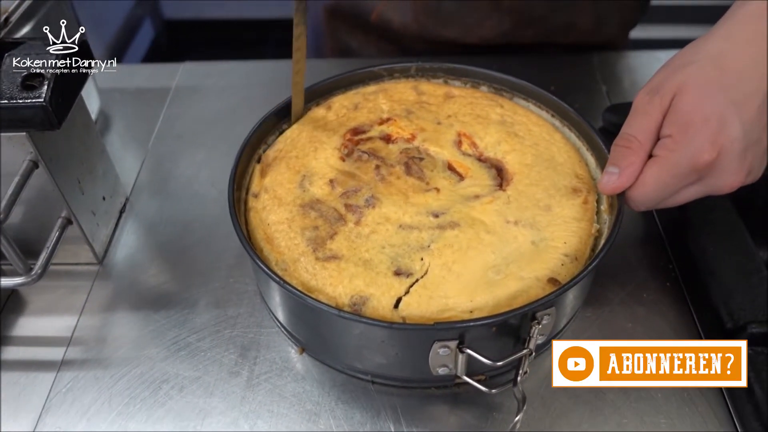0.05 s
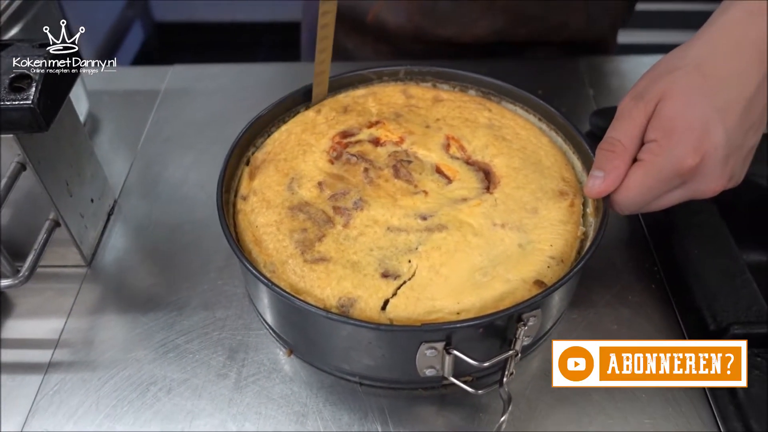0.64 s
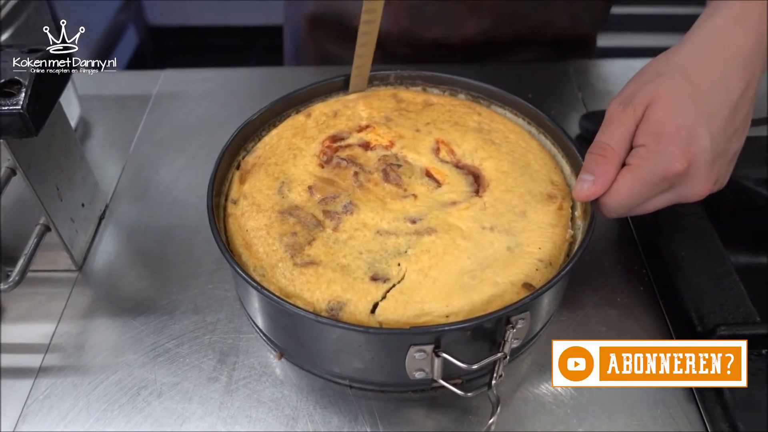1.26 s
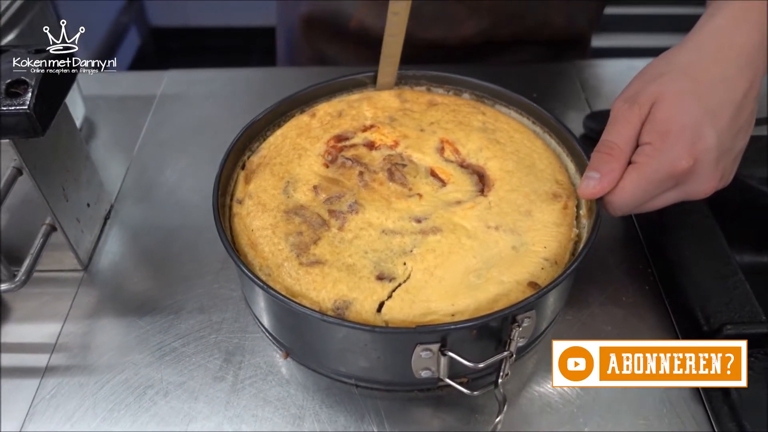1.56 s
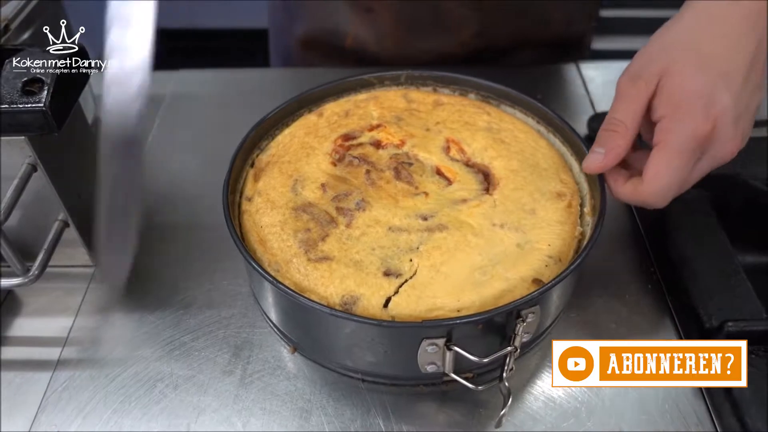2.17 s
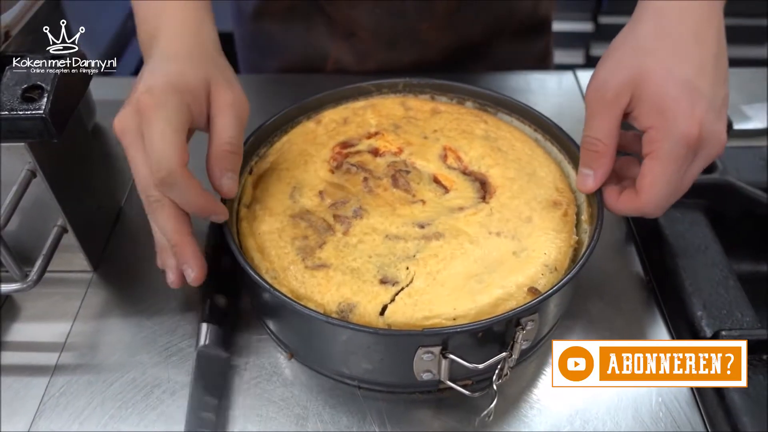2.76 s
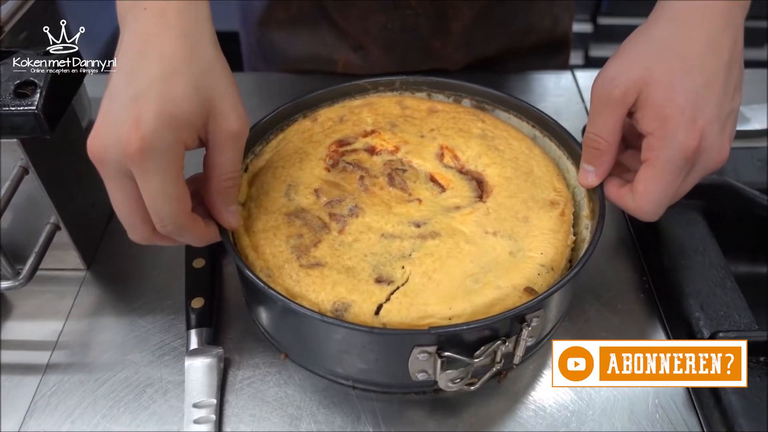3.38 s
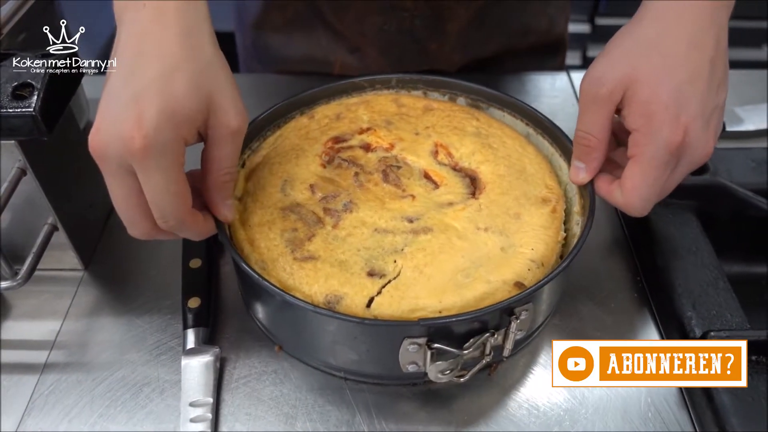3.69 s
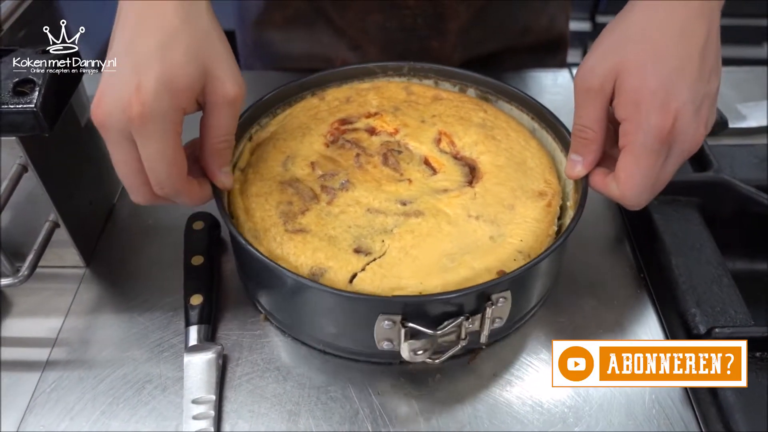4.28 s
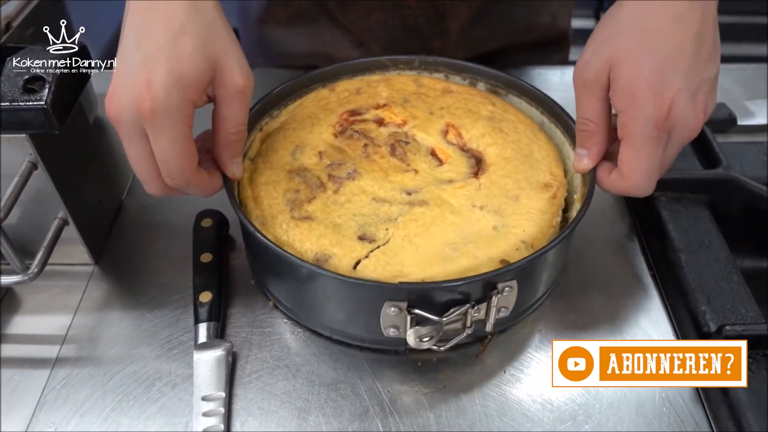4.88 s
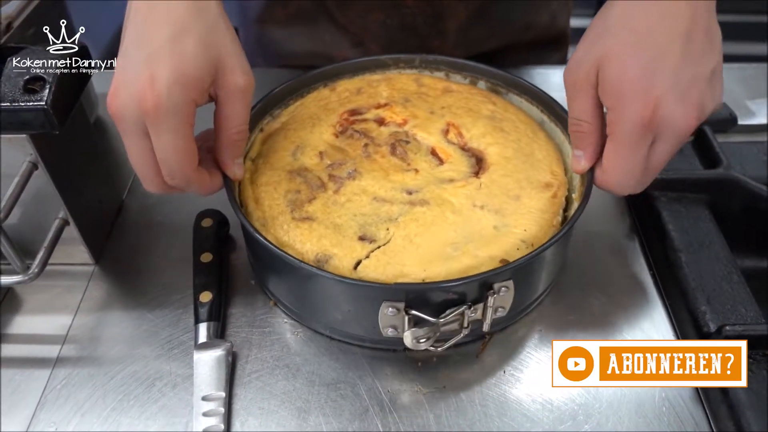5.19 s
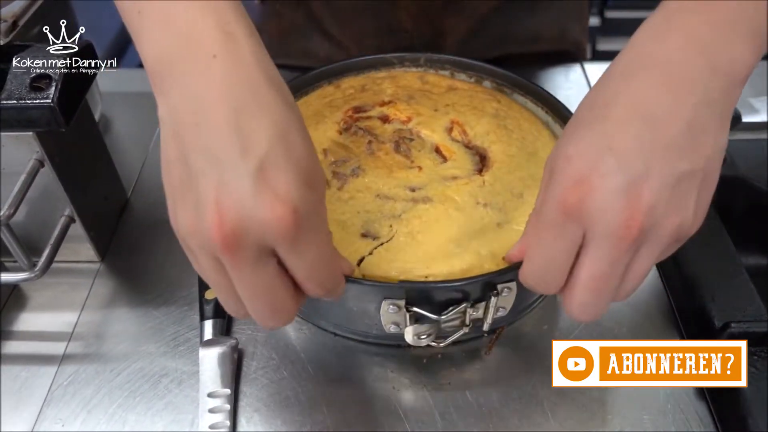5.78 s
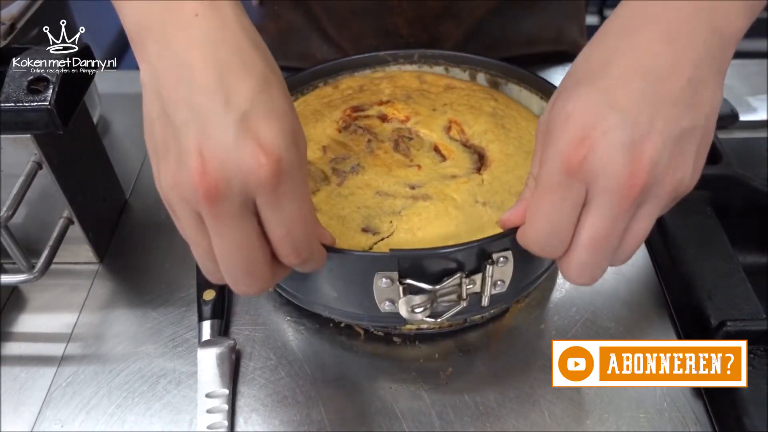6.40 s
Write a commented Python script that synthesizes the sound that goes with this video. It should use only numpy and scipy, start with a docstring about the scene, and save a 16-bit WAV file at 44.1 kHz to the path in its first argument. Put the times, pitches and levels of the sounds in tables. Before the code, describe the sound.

Soft kitchen ventilation rushes throughout with a faint motor hum. For the first two seconds a knife makes short, quiet scrapes around a metal springform pan, the earliest with a thin squeak. The blade pings on the rim at about 1.9 seconds. From 2.4 to 3.2 seconds the knife clatters onto a steel counter, blade and handle bouncing and ringing, loudest around 2.8. The background swells with the clatter, dips near 3.5 seconds and recovers. After one click at 3.3, the clasp is worked open from 3.7 to 4.5 seconds in a dense run of sharp clicks, knocks and scrapes that make the pan's wall chime. Lighter ticks follow. Between 5.3 and 6.6 seconds the loosened ring is lifted with brief rasps, ticks and snaps, the strongest near 5.8. Everything sounds close, with a short echo from hard walls.

```python
"""Kitchen ventilation hums while a knife scrapes and squeaks round a cheesecake in a springform pan. The blade
pings on the rim, then the knife clatters onto a steel counter, and both ring. The background level rises during
the clatter, then dips briefly and recovers. Then the clasp is worked open in a string of clicks that make the
pan's wall chime, and the loosened ring scrapes as it is lifted while the pan knocks on the counter."""
import sys
import numpy as np
from scipy import signal
from scipy.fft import rfft, irfft
from scipy.io import wavfile
from scipy.ndimage import uniform_filter1d

SR = 44100
rng = np.random.default_rng(int(sys.argv[2]) if len(sys.argv) > 2 else 0)


def digitize_waveform(pressure):
    """Quantize a signal to 16-bit integers and store it at the path in sys.argv[1].

    Rows of a 2-D input are taken as channels; values are limited to [-1, 1].
    """
    field = np.atleast_2d(pressure).T
    bounded = np.clip(field, -1, 1)
    quanta = np.round(bounded * 32767).astype(np.int16)
    wavfile.write(sys.argv[1], SR, quanta)


N = 293265


def amp(db):
    return 10 ** (np.asarray(db) / 20)


def unit(x):
    return x / np.sqrt(np.mean(x ** 2) + 1e-20)


def fade(t, t60):
    """Dies away by 60 dB in t60 seconds, the "ring time"."""
    return 1e-3 ** (t / t60)


def read(points, hz):
    """Looks up a curve at the given frequencies."""
    f, value = np.transpose(points)
    return np.interp(np.log(hz + 1), np.log(f + 1), value)


def add(mix, start, sound):
    part = mix[:, round(start * SR):][:, :sound.shape[1]]
    part += sound[:, :part.shape[1]]


def colour(x, points):
    """Shapes the lows and highs of x by (Hz, dB) points, then sets its strength to 1."""
    return unit(irfft(rfft(x) * amp(read(points, np.fft.rfftfreq(N, 1 / SR))), N))


def resonate(x, hz, width_hz):
    """Keeps one pitch of x; a narrower peak rings longer."""
    return signal.lfilter(*signal.iirpeak(hz, hz / width_hz, SR), x)


def spread(pair, width, balance_db):
    """Turns a middle and a side signal into left and right."""
    middle, side = pair[0], width * pair[1]
    return np.array([(middle + side) * amp(balance_db / 2), (middle - side) * amp(-balance_db / 2)])


# The tone of the air. Each row: frequency in Hz, relative level in dB.
AIR_TONE = [(18, -78.5), (30, -36.5), (98, -25.5), (146, -14), (182, -13), (422, -5.5), (540, 0.5),
            (907, -5), (1000, -5.5), (1250, -6.5), (1420, -4), (2620, -7.5), (3900, -15), (4630, -14.5),
            (11000, -20), (14300, -61), (22000, -120)]
# Each row: frequency in Hz, how alike the air is left and right (1 is the same).
AIR_LIKENESS = [(60, 0.78), (140, 0.96), (350, 0.96), (840, 0.86), (2030, 0.45), (4890, 0.063),
                (11800, 0.13)]
# The motor's hum. Each row: pitch in Hz, level at the start in dB.
MOTOR_HUM = [(100, -85), (147, -94.5), (197, -73)]
# The background level as it is heard. Each row: time in seconds, level in dB.
BACKGROUND_LEVEL = [(0, -50), (.9, -49), (1.6, -51.5), (2.35, -50.5), (2.8, -43), (3.45, -61.5), (3.8, -59),
                    (4.6, -51), (5, -50.5), (5.6, -49.5), (6.3, -51), (6.65, -52.5)]

def ventilation(patchy_db=2.0):
    """Rushing air whose tone wavers in patches, and a faint motor hum."""
    frames, hz, t = N // 256 + 5, np.fft.rfftfreq(1024, 1 / SR), np.arange(N) / SR
    noise = rng.standard_normal((5, frames, len(hz))).transpose(0, 2, 1)
    left, separate = noise[0] + 1j * noise[1], noise[2] + 1j * noise[3]
    patches = unit(uniform_filter1d(uniform_filter1d(noise[4], size=8, axis=0), size=12, axis=1))
    alike = read(AIR_LIKENESS, hz)[:, None]
    right = alike * left + np.sqrt(1 - alike ** 2) * separate
    spectrum = np.array([left, right]) * amp(read(AIR_TONE, hz)[:, None] + patchy_db * patches)
    air = unit(signal.istft(spectrum, nperseg=1024, noverlap=768)[1][:, :N])
    hum = sum(amp(db) * np.sqrt(2) * np.sin(2 * np.pi * f * t) for f, db in MOTOR_HUM)
    level = amp(np.interp(t, *np.transpose(BACKGROUND_LEVEL)))
    return level * (air + hum / level[0])


def pressure(strokes):
    """The push swells and fades with each stroke."""
    push = np.zeros((1, N))
    for start, length, db in strokes:
        add(push, start, amp(db) * np.hanning(int(length * SR))[None])
    return push


# Blade or ring scrapes the pan. Each row: start in seconds, length in seconds, level in dB.
SCRAPE_STROKES = [(0.027, 0.089, -51.5), (.18, 0.058, -52.5), (0.367, 0.062, -52.5), (0.531, .06, -45.5),
                  (1.015, 0.072, -52), (1.647, 0.053, -50.5), (1.797, 0.066, -47.5), (3.935, 0.16, -45),
                  (4.03, 0.26, -39.5), (4.17, 0.14, -41), (4.35, 0.043, -42.5), (5.315, 0.076, -33.5),
                  (5.723, 0.055, -33.5), (6.052, 0.098, -39), (6.37, 0.11, -44.5)]
# The tone of a scrape. Each row: frequency in Hz, relative level in dB.
SCRAPE_TONE = [(800, -11), (2500, 3), (4200, 2), (5200, 2.5), (5750, 1.5), (6500, -7.5), (11000, -3.5)]
# The blade squeaks on the wall. Each row: start in seconds, length in seconds, level in dB.
SQUEAK_STROKES = [(.03, 0.063, -61), (.19, 0.046, -65), (.38, 0.055, -66), (.54, 0.062, -52.5)]

def scrapes(slips_per_s=5000, uneven_db=2.5):
    """Steel slides along the pan in tiny uneven slips; under the blade they stir up a squeak."""
    sizes = amp(uneven_db * np.minimum(rng.exponential(1, N), 4))
    slips = rng.standard_normal((2, N)) * sizes * (rng.random(N) < slips_per_s / SR)
    rasp = pressure(SCRAPE_STROKES) * colour(slips, SCRAPE_TONE)
    squeak = pressure(SQUEAK_STROKES) * unit(resonate(slips, hz=5770, width_hz=70))
    return spread(rasp + squeak, width=0.46, balance_db=-1.5)


# The five bands of a hit, bass to treble. Each row: low edge in Hz, high edge in Hz,
# ring time multiplier, stereo width, left over right in dB.
HIT_BANDS = [(358, 722, 2.95, 0.092, 0.2), (610, 1185, 2.37, 0.18, 1.2), (1417, 2980, 1.46, 0.39, 1),
             (2790, 6080, 1.15, 0.52, 0.3), (6040, 12900, 1.36, 0.78, -5)]

def steel_hit(levels, chatter_s, t60, tail_db, tail_t60, rattle_db=3.0):
    """Steel on steel: a burst of tiny impacts, then a crowd of tones dies away over a softer tail."""
    t = np.arange(SR // 2) / SR
    out = np.zeros((2, len(t)))
    bounces = unit(uniform_filter1d(rng.standard_normal(len(t)), size=60))
    rattle = amp(rattle_db * bounces * fade(t, 0.57))  # impacts bunch up while the parts still touch
    for db, (low, high, stretch, width, balance_db) in zip(levels, HIT_BANDS):
        ring = fade(np.maximum(t - chatter_s, 0), min(t60 * stretch, max(t60, .4)))
        shape = np.hypot(ring, amp(tail_db) * fade(t, tail_t60)) * (1 - fade(t, 0.003))
        band = signal.butter(3, [low, high], "band", fs=SR, output="sos")
        burst = signal.sosfilt(band, shape * rattle * rng.standard_normal((2, len(t))))
        burst *= np.linalg.norm(shape) / np.linalg.norm(burst, axis=1, keepdims=True)
        out += amp(db) * spread(burst, width, balance_db)
    return out


def chime(tones, phase_gap, balance_db):
    """Fading pure tones (Hz, ring time, dB); the higher they are, the more left and right differ."""
    t, sides = np.arange(SR * 2 // 5) / SR, np.array([[.5], [-.5]])
    hz, t60, db = np.transpose(tones)
    height = hz / 8000
    phase = 2 * np.pi * rng.random(len(hz)) + sides * phase_gap * height
    gains = amp(db + sides * balance_db * height ** 3) * np.exp(1j * phase)
    waves = np.exp(2j * np.pi * hz[:, None] * t) * fade(t, t60[:, None])
    return np.sqrt(2) * (gains @ waves).imag * (1 - fade(t, 0.003)) ** 2


def sheet(hits, tones, flex_db, thump_db):
    """A struck steel sheet rings on; it also bends slowly and thumps the counter frame."""
    rings = sum(amp(db) * resonate(hits, hz, width) for hz, width, db in tones)
    force = np.sqrt(abs(signal.lfilter(*signal.butter(1, 12, fs=SR), hits.mean(0) ** 2)))
    flex_tone = [(60, -36), (130, -16), (200, 1), (280, -3), (400, -25.5), (1500, -85.5)]
    flex = colour(rng.standard_normal(N), flex_tone)
    thump = colour(rng.standard_normal(N), [(8, -21), (25, 0), (100, 1.5), (200, -17.5), (800, -83)])
    return hits + rings + force * (amp(flex_db) * flex + amp(thump_db) * thump)


def struck_at(place, values):
    """Blends the values for places on the blade: 0 (or less) edge, 1 tip, 2 flat, 3 heel."""
    return np.interp(place, np.arange(len(values)), values)


def tilted(bands_db, bright_db, pivot_band):
    """Tilts a hit's tone: positive brightness lifts the bands above the pivot and thins those below."""
    return np.array(bands_db) + bright_db * (np.arange(len(bands_db)) - pivot_band)


# Hits on edge, tip, flat and heel. Each row: base ring time in seconds, five band levels in dB.
BLADE_PLACES = [(0.047, -16, -16, -5, 0, -2.5), (0.45, -13.5, -1, 1.5, 0.0056, 2),
                (0.344, -17, -11, -4, -1, 5), (0.098, -10.5, -12.5, -7, -1, 9.5)]
# The blade lands. Each row: start in seconds, chatter in seconds, relative level in dB,
# blade ring in dB, place on the blade.
BLADE_HITS = [(1.853, .010, -38, -48, 0), (1.861, .008, -35, -33, 0), (2.351, .0025, -30, -30, 1),
              (2.499, .011, -27.5, -25, 1.7), (2.543, .016, -31, -28.5, 2.2),
              (2.560, .036, -29.5, -22.5, 2), (2.610, .003, -33, -36, 1.3), (2.864, .010, -30, -36, 3),
              (2.958, .009, -33.5, -26.5, 3), (3.000, .004, -39, -26.5, 0), (3.041, .0036, -31.5, -34, 3),
              (3.121, .003, -32, -43, 3), (3.173, .003, -35, -50, 3)]

def blade_hits():
    """The blade meets rim or counter; the place that lands sets the tone."""
    hits = np.zeros((2, N))
    for start, chatter_s, db, _, place in BLADE_HITS:
        t60, *bands = [struck_at(place, column) for column in zip(*BLADE_PLACES)]
        add(hits, start, steel_hit(db + np.array(bands), chatter_s, t60, tail_db=-23, tail_t60=.45))
    return hits


# The blade's own tones. Each row: pitch in Hz, ring time in seconds,
# then relative level in dB when struck on the edge, the tip, the flat and the heel.
BLADE_TONES = [(4016, .12, -6, -22, -16, -25), (4075, .24, -22, -6, 3, -13), (4495, .18, -3, -16, -22, -3),
               (5308, .12, 2, -20, -24, 4), (5792, .22, -24, -18, -2, -20), (6000, .15, -12, -15, -25, -11),
               (7770, .13, -3, 0, 4, -13), (8262, .2, -26, -20, -19, 5.5), (2487, .2, -20, -2, -8, -8),
               (4635, .2, -9, -5, -19, -18), (5658, .2, -22, 0, -9, -16), (6372, .16, -11, -16, -14, -20),
               (1700, .45, -20, -2, -14, -22), (2089, .33, -13, -4, -19, -24),
               (2600, .15, -5, -20, -24, -22), (5030, .15, -22, -9, -20, -22),
               (5475, .2, -18, -24, -22, -9), (6620, .27, -24, -7, -16, -22),
               (7055, .3, -19, -13, -21, -17), (8834, .24, -24, -8, -20, -22),
               (9150, .16, -22, -14, -22, -10), (9750, .15, -16, -20, -22, -22),
               (10136, .25, -21, -12, -14, -20), (10470, .2, -15, -22, -22, -11),
               (10850, .25, -22, -10, -18, -19)]

def blade_ring(hits):
    """Each new touch stops the blade's ringing and starts it afresh."""
    rings = np.zeros((2, N))
    damping = fade(np.arange(SR // 2) / SR, 0.017)
    for start, *_, ring_db, place in sorted(hits):
        rings[:, round(start * SR):][:, :len(damping)] *= damping
        tones = [(hz, t60, struck_at(place, levels)) for hz, t60, *levels in BLADE_TONES]
        add(rings, start, amp(ring_db) * chime(tones, phase_gap=1.64, balance_db=-3))
    return rings


# The handle's tone: a relative level in dB for each of the five bands.
HANDLE_TONE = [-5, -3, .5, -4, -4]
# The handle lands. Each row: start, chatter and base ring time in seconds, relative level in dB,
# brightness in dB per band, blade ring in dB, place on the blade.
HANDLE_HITS = [(2.751, .004, .03, -39, 4.5, -40, 0.5), (2.759, 0.0081, .05, -30, 2, -34, -3),
               (2.7765, .006, .02, -18.5, -.5, -34, 1), (2.786, .032, .03, -25, 0, -25, 2),
               (2.824, 0.031, .008, -20.5, 0, -21, 2.5), (2.88, 0.026, .04, -28.5, 4.5, -31.5, 3),
               (2.906, 0.035, .03, -25, 1, -27, 3), (2.934, .017, .01, -22.5, -0.5, -28.5, 3),
               (2.980, 0.026, .34, -29.5, 0, -28.5, 3)]

def handle_hits():
    """The handle drops and rocks on the counter."""
    hits = np.zeros((2, N))
    for start, chatter_s, t60, db, bright, _, _ in HANDLE_HITS:
        levels = db + tilted(HANDLE_TONE, bright, 2.3)
        add(hits, start, steel_hit(levels, chatter_s, t60, tail_db=-33, tail_t60=0.48, rattle_db=2.5))
    return hits


# The counter top's tones. Each row: pitch in Hz, width in Hz, relative level in dB.
COUNTER_TONES = [(470.7, 5.4, 5), (698, 9.3, -3.5), (860, 83, -0.5), (1056, 12, 5.5), (1583, 39, 2.5),
                 (1760, 23, -2.5)]

def knife_clatter():
    """Blade and handle bounce to rest, shaking both the counter and the blade."""
    counter = sheet(blade_hits() + handle_hits(), COUNTER_TONES, flex_db=-35.5, thump_db=-47.5)
    return amp(-3) * counter + blade_ring(BLADE_HITS + HANDLE_HITS)


# Each row: start in seconds, relative level in dB, brightness in dB per band, tail in dB, chime in dB.
CLASP_SNAPS = [(3.318, -38.5, -3.5, -23, -11), (3.924, -28.5, 0.5, -13.5, -12.5),
               (4.054, -27.5, 0.5, -4, -22), (4.189, -28, 2, -7.5, -11), (4.252, -37.5, -0.5, -14, -5),
               (4.315, -27, -3.5, -26, -24), (4.449, -22.5, -0.5, -14.5, -12), (5.341, -31, -3, -21, -30),
               (5.756, -25.5, 1, -26, -32), (5.764, -22.5, -2.5, -11, -8), (6.023, -26, 0, -12.5, -11)]

def snaps(bands_db=(-17, -12, 0.5, -0.5, -0.5), hz=4100, t60=0.04):
    """Lists the clicks of the clasp or ring springing free."""
    return [(start, db + tilted(bands_db, bright, 2.05), hz, t60, tail_db, chime_db)
            for start, db, bright, tail_db, chime_db in CLASP_SNAPS]


# Each row: start in seconds, relative level in dB, brightness in dB per band, pitch in Hz.
LEVER_TICKS = [(3.731, -52, -4.5, 3730), (3.799, -34.5, -0.5, 2970), (3.829, -45.5, -1, 4140),
               (3.859, -39, -1, 4480), (3.888, -34, -2.5, 5140), (3.96, -27.5, 2, 5500),
               (3.992, -31, 2, 2900), (4.013, -34, .5, 5290), (4.04, -26.5, -4, 3900),
               (4.103, -39, -4.5, 4450), (4.125, -31, 7.5, 4180), (4.149, -30.5, -1, 4500),
               (4.375, -22.5, -0.5, 6100), (4.41, -31, 7, 6040), (4.512, -32.5, 1.5, 2900),
               (4.561, -44.5, 0, 3190), (4.673, -41.5, -2, 3010), (4.919, -40, 3.5, 4270),
               (4.976, -45, -5, 4730), (5.036, -36.5, 3.5, 4700), (5.188, -41.5, -3, 4250),
               (5.259, -37.5, -2.5, 3930), (5.316, -32.5, -3.5, 3800), (5.343, -23.5, -1.5, 3950),
               (5.908, -38, 3, 4870), (5.937, -32.5, 1.5, 4900), (6.082, -33, -1, 4170),
               (6.094, -28.5, 0, 4490), (6.134, -42, 11.5, 3660), (6.195, -39, 3, 4110),
               (6.574, -31.5, 0.5, 4340), (6.623, -41.5, -3, 4700)]

def ticks(bands_db=(-23, -17.5, -9.5, 0.5, -6), t60=0.028, tail_db=-18.5, chime_db=-20):
    """Lists the clicks of the lever slipping and catching, plus a faint one from handling the pan."""
    faint = (rng.uniform(3.8, 4.3), -46, 0, 4200 * 2 ** rng.uniform(-.5, .5))
    return [(start, db + tilted(bands_db, bright, 3), hz, t60, tail_db, chime_db)
            for start, db, bright, hz in LEVER_TICKS + [faint]]


# Each row: start in seconds, relative level in dB, brightness in dB per band.
PAN_KNOCKS = [(4.02, -38, 2.5), (4.039, -26.5, 3), (4.178, -31, 1.5), (4.32, -26.5, .5), (4.722, -39, -1),
              (4.87, -35.5, -1), (5.036, -41.5, -4.5), (5.814, -35.5, -2.5)]

def knocks(bands_db=(-0.5, -0.5, -5, -5, -10.5), hz=3700, t60=0.027, tail_db=-13, chime_db=-30):
    """Lists the duller knocks of the pan's bottom on the counter."""
    return [(start, db + tilted(bands_db, bright, 2.1), hz, t60, tail_db, chime_db)
            for start, db, bright in PAN_KNOCKS]


# The wall's bell-like tones. Each row: pitch in Hz, ring time in seconds when not held, relative dB.
WALL_TONES = [(1835, 0.3, -6), (2065, 0.26, -5.5), (2147, 0.21, -6), (2240, 0.24, -6.5), (2244, 0.26, 1.5),
              (2330, 0.2, -2.5), (2350, 0.19, -2.5), (2440, .28, -1), (2500, 0.17, -5.5), (2540, 0.28, -3),
              (2710, 0.23, -9.5), (2744, 0.21, -5.5)]
# The pan's body tones. Each row: pitch in Hz, width in Hz, relative level in dB.
PAN_TONES = [(371.4, 14, -5.5), (466, 32, -8.5), (612, 18, -8.5), (858, 20, 4.5), (1247, 20, 3.5),
             (1740, 9.1, -44), (3710, 82, -6)]

def pan_clicks(events, hand_damping=0.73):
    """Plays each click with its own pitch; the wall chimes, cut short by the hands that hold it."""
    clicks, wall = np.zeros((2, 2, N))
    for start, levels, hz, t60, tail_db, chime_db in events:
        burst = steel_hit(levels, chatter_s=0.0024, t60=t60, tail_db=tail_db, tail_t60=0.33)
        add(clicks, start, burst + amp(1) * resonate(burst, hz, width_hz=300))
        bend = rng.uniform(.985, 1.015)  # the hands bend the wall a little out of tune
        tones = [(pitch * bend, ring_s * hand_damping, db) for pitch, ring_s, db in WALL_TONES]
        strength = amp(levels[2] + chime_db)  # the middle band drives the wall
        add(wall, start, strength * chime(tones, phase_gap=2.5, balance_db=14))
    clank = amp(-2) * resonate(clicks, hz=2276, width_hz=230)  # the whole ring clanks roughly
    return amp(-2.5) * (sheet(clicks + clank, PAN_TONES, flex_db=-33, thump_db=-55) + wall)


# How long the room echoes. Each row: frequency in Hz, ring time in seconds.
ECHO_TIMES = [(150, 0.25), (500, 0.69), (2000, 0.63), (5000, 0.35), (10000, 0.3)]
# How wide the echo spreads. Each row: frequency in Hz, stereo width (0 is dead centre).
ECHO_WIDTHS = [(300, 0.17), (700, .25), (2000, .55), (6000, 0.82)]

def kitchen_echo(x, echoes_per_s=4000):
    """Hard walls throw back many echoes; middle pitches last longest and the treble spreads widest."""
    echoes = rng.standard_normal((2, SR)) * (rng.random((2, SR)) < echoes_per_s / SR)
    echoes *= np.arange(SR) > .005 * SR  # nothing comes back in the first 5 ms
    hz, t, spectrum = signal.stft(echoes, SR, nperseg=256)
    spectrum = spectrum * fade(t, read(ECHO_TIMES, hz)[:, None])
    spectrum = spread(spectrum, read(ECHO_WIDTHS, hz)[:, None], balance_db=0)
    tail = signal.istft(spectrum, SR, nperseg=256)[1]
    return signal.fftconvolve(x, tail / np.linalg.norm(tail[0]), axes=1)[:, :N]


def scene(knife_echo_db=-12, pan_echo_db=-10):
    """Knife and pan in a hard-walled kitchen, with the ventilation behind."""
    knife = knife_clatter()
    pan = pan_clicks(snaps() + knocks() + ticks()) + scrapes()
    echo = kitchen_echo(amp(knife_echo_db) * knife + amp(pan_echo_db) * pan)
    return knife + pan + echo + ventilation()


def record(dry, cutoff_hz=11130):
    """Cuts off the highest treble steeply."""
    lowpass = signal.firwin(301, cutoff_hz, window=("kaiser", 4), fs=SR)
    return signal.oaconvolve(dry, lowpass[None], "same", axes=1)


dry = scene()
out = record(dry)
digitize_waveform(out)
```